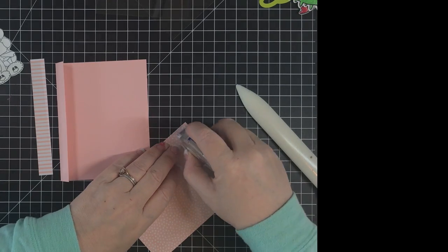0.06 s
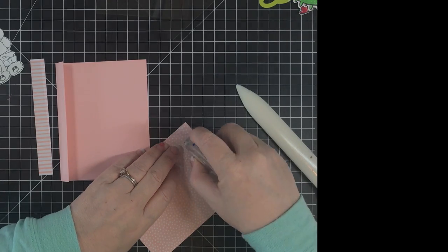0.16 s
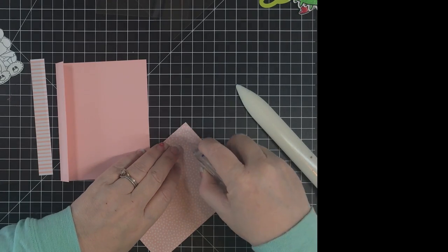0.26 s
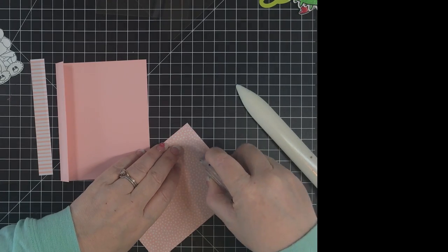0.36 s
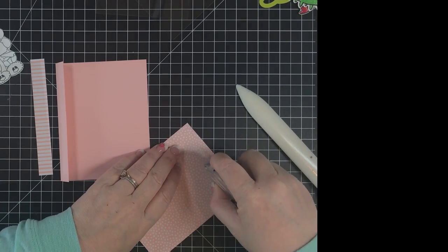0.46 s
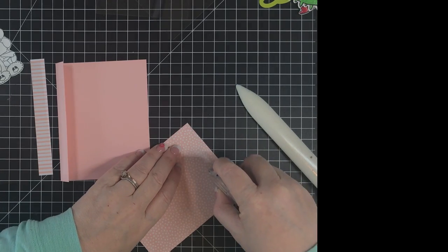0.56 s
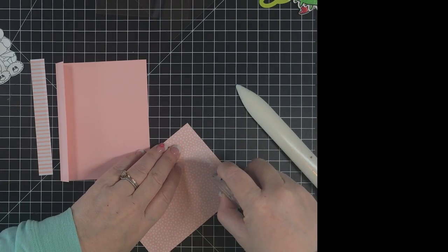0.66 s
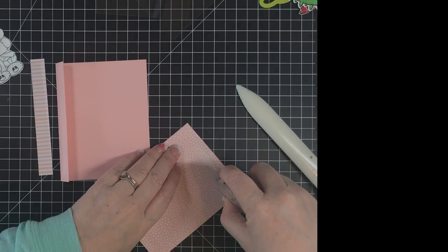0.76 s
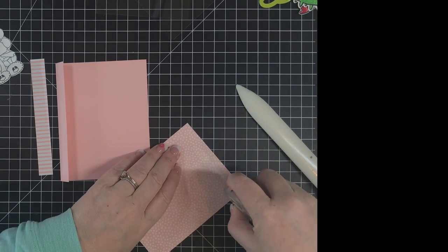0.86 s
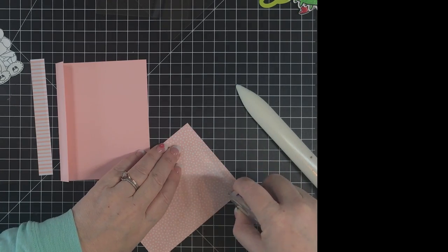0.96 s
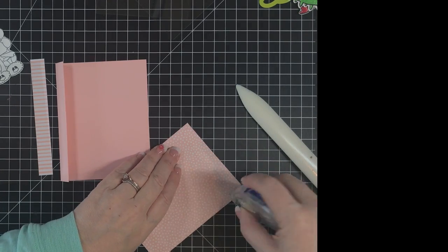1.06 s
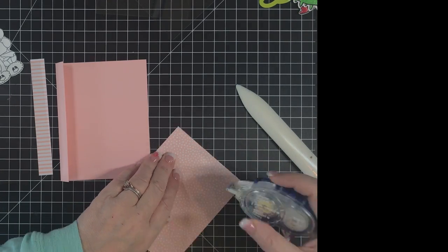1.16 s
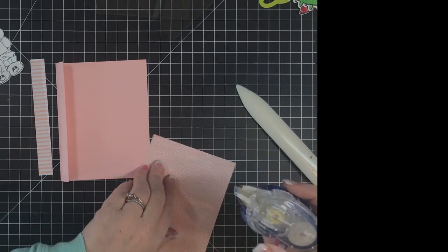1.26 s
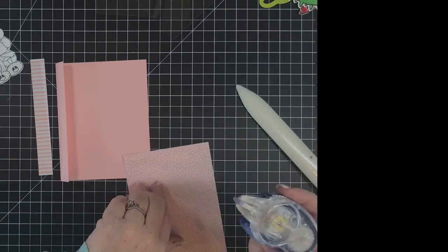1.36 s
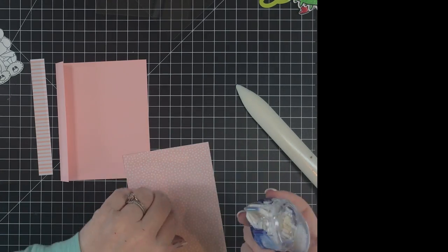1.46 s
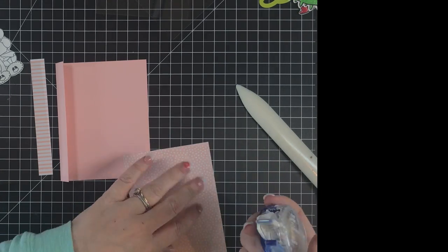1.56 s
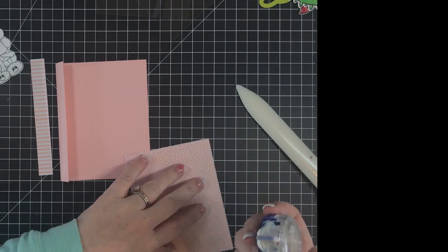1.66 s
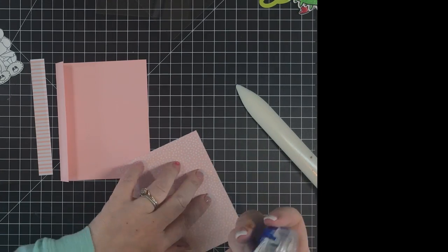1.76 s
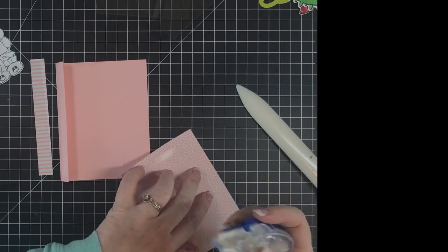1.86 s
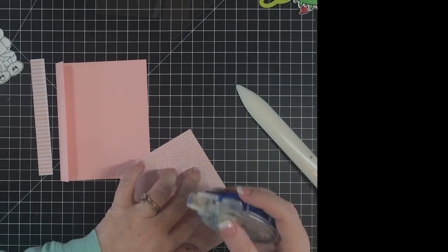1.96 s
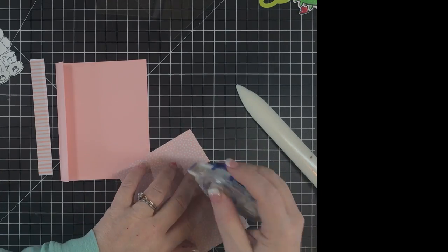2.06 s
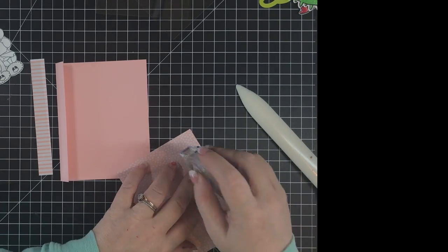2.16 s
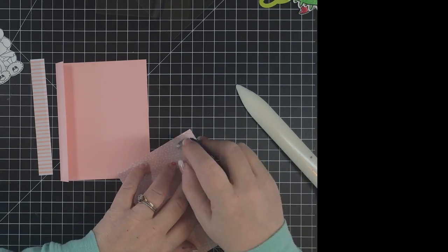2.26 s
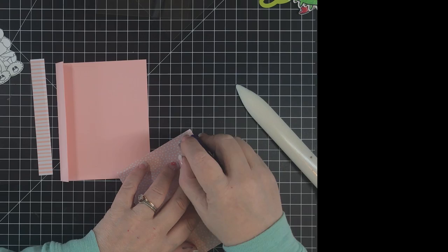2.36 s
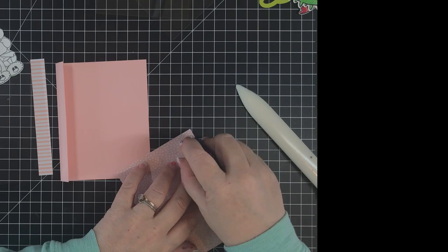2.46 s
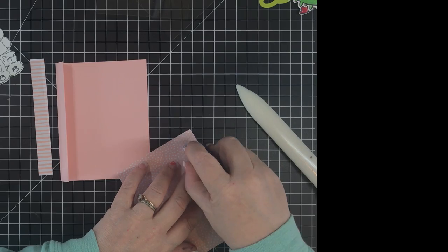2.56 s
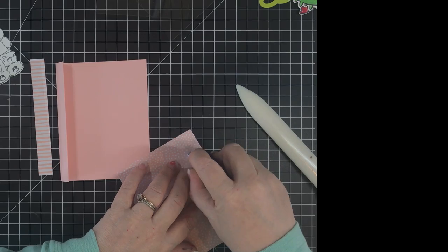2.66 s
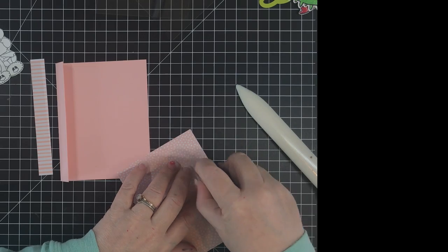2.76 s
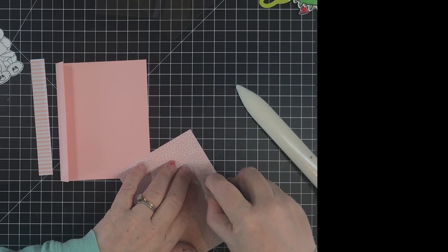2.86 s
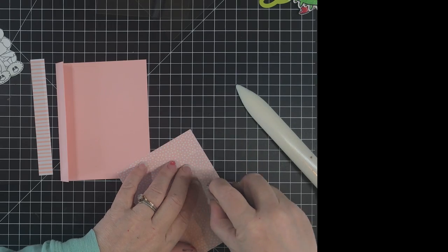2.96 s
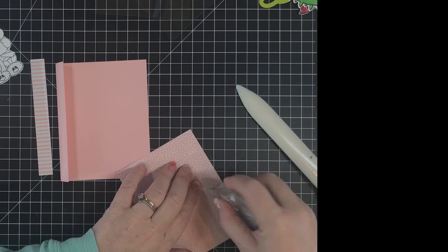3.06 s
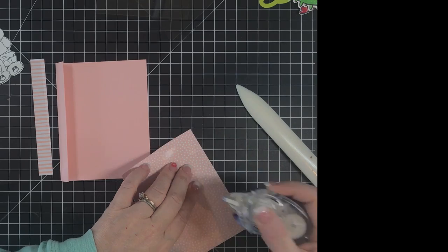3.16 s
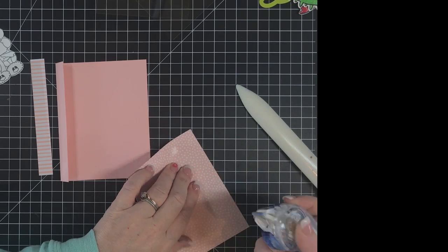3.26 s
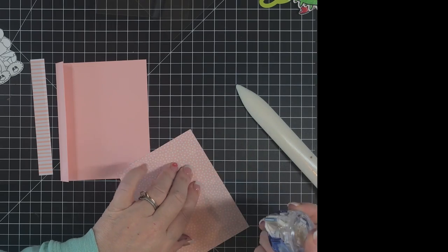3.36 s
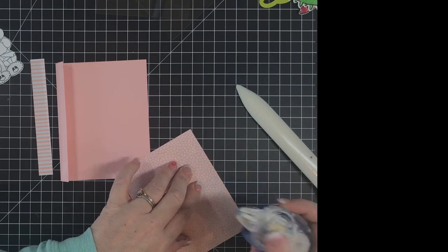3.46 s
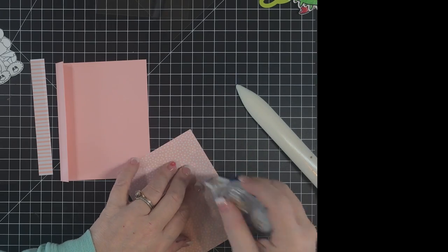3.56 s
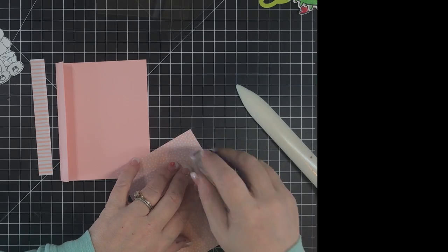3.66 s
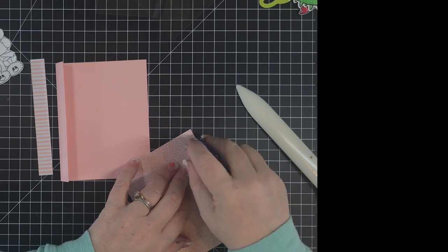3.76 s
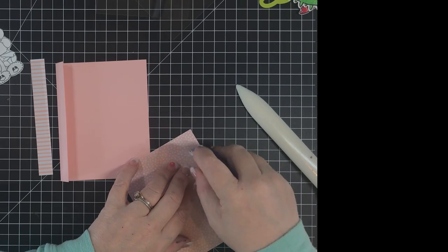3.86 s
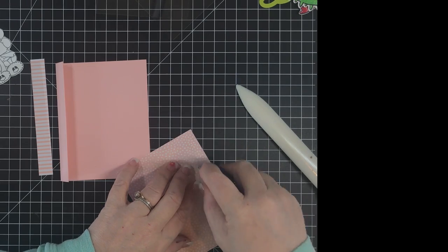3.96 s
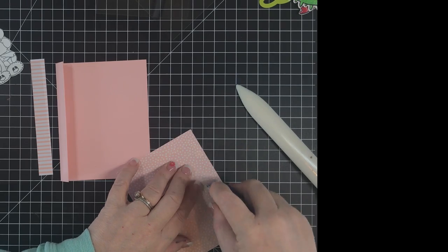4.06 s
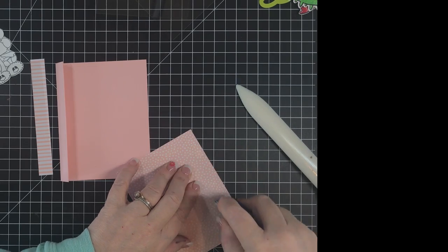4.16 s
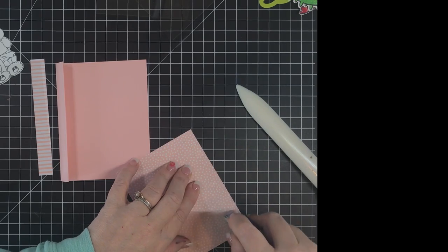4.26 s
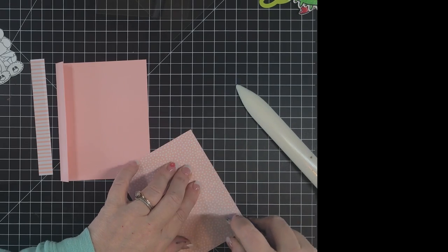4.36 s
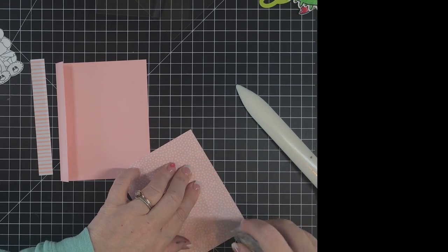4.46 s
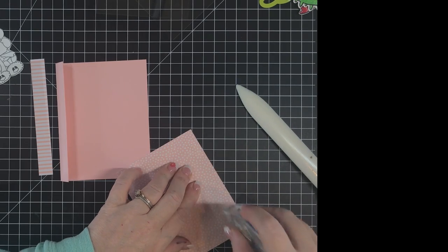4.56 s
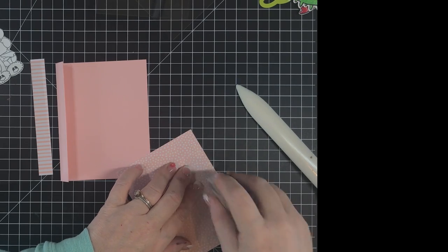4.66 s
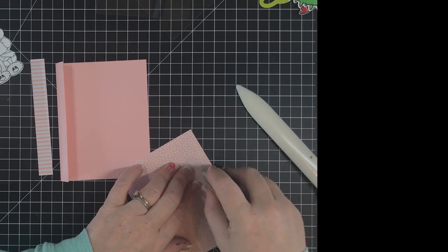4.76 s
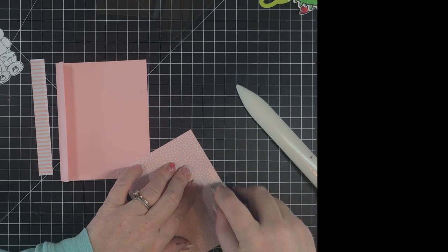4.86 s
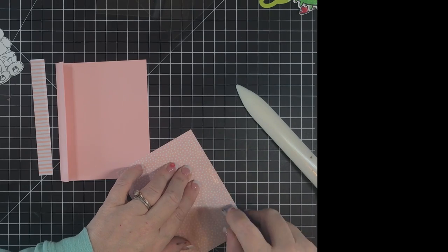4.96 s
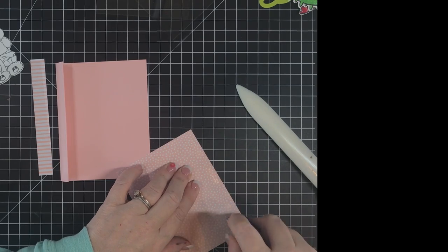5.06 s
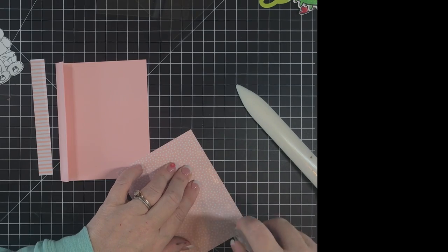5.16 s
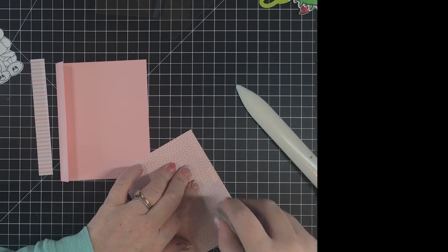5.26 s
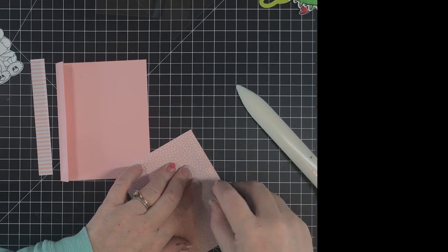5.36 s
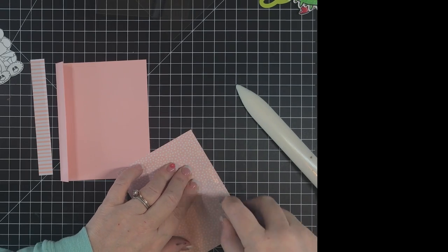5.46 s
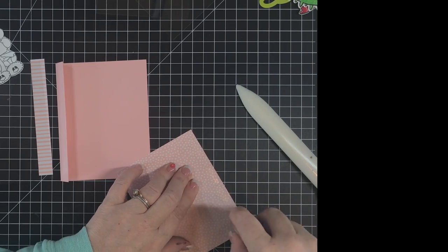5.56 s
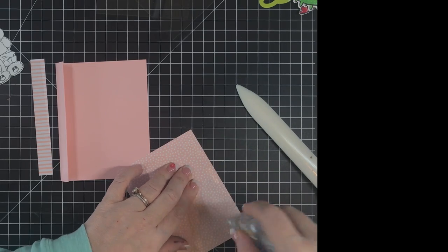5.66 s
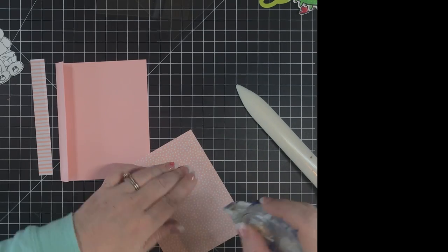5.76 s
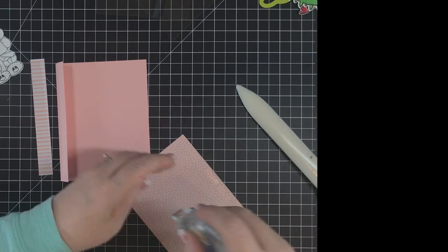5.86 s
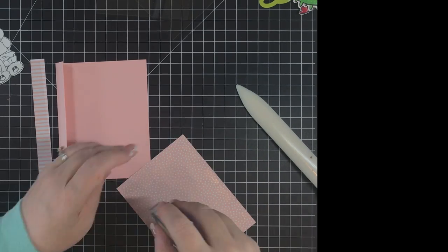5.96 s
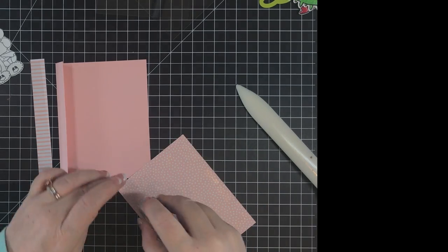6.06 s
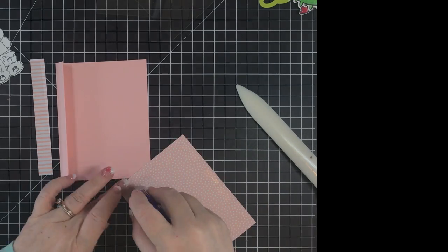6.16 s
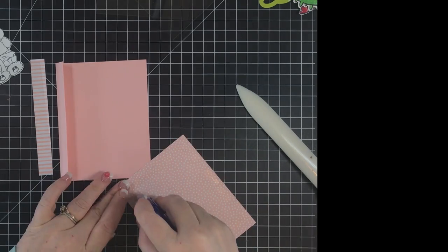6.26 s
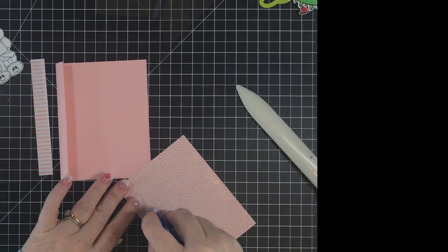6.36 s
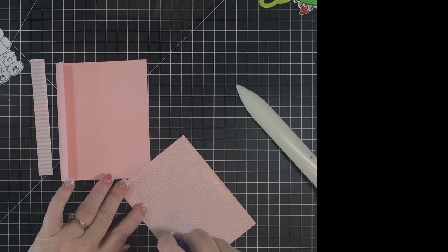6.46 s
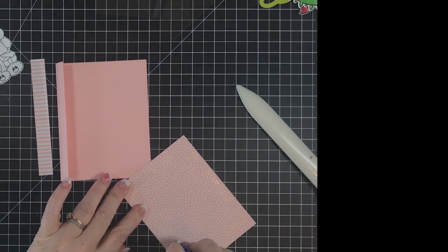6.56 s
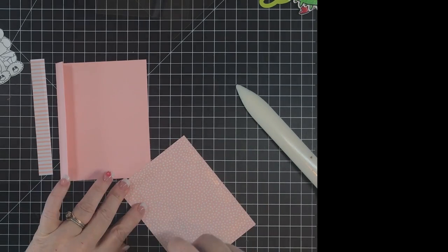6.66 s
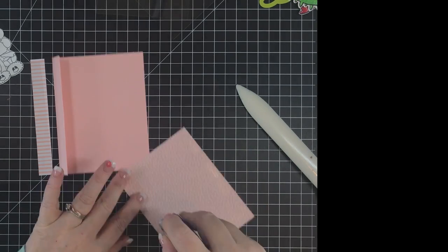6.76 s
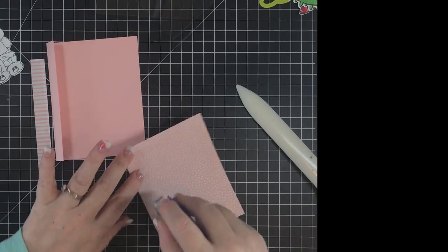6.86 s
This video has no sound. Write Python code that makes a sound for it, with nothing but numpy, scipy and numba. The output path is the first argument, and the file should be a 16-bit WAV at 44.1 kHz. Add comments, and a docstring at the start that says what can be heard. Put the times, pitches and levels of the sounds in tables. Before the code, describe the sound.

Close up in a small, faintly humming room, an adhesive tape runner makes a bright, ratcheting rasp along paper. After a pause filled with soft paper sliding and a few clicks, it goes on in short, uneven strokes. One sharp plastic snap stands out midway, and the hollow casing knocks lightly and bumps the table as it lands and lifts between strokes.

```python
"""Tape runner on paper, close up.

A hand-held tape runner is drawn along paper on a cutting mat. Its ratchet clicks tooth by tooth, blurring to a
rasp in fast strokes, and rings the hollow shell. Nose and fingers slide on the paper, touch-downs knock the
shell and thump the table, paper and plastic snap now and then; a small room hums quietly."""
import sys
import numpy as np
from scipy import signal
from scipy.fft import rfft, irfft, next_fast_len
from scipy.io import wavfile
from scipy.ndimage import uniform_filter1d
from numba import njit

SR = 44100
rng = np.random.default_rng(int(sys.argv[2]) if len(sys.argv) > 2 else 0)


def put_to_file(sound):
    """Save the sound as 16-bit audio at rate SR, in the file named by the first command-line argument."""
    columns = np.atleast_2d(sound).T  # one column per channel
    safe = np.clip(columns, -1, 1)
    whole_steps = np.round(safe * 32767)
    wavfile.write(sys.argv[1], SR, whole_steps.astype(np.int16))


N = 305172

# Runner travel, per stroke: (time [s], rolled so far [teeth])
STROKE_TRAVEL = [
    [(.1335, 0), (.1656, 2), (.3871, 15), (.4096, 16), (.4563, 19), (.528, 23), (.5618, 25), (.5705, 26),
     (.5908, 27), (.7085, 32), (.7613, 34), (.8265, 36), (.8677, 37)],
    [(2.5762, 0), (2.6099, 2), (2.6701, 7), (2.7002, 9), (2.7206, 10), (2.7432, 11), (2.7674, 12),
     (2.7929, 13)],
    [(3.8645, 0), (3.8943, 1), (3.9095, 2), (3.968, 8), (4.002, 12)],
    [(4.1334, 0), (4.1661, 2)],
    [(4.4427, 0), (4.482, 4), (4.5023, 6)],
    [(4.8324, 0), (4.842, 1), (4.861, 2), (4.916, 8), (4.936, 10)],
    [(5.0129, 0), (5.0283, 1), (5.0496, 2)],
    [(5.1539, 0), (5.205, 6), (5.2176, 7)],
    [(5.459, 0), (5.4778, 1), (5.51, 4), (5.5579, 9)],
    [(5.6306, 0), (5.646, 1), (5.6828, 5)],
    [(6.3034, 0), (6.33, 2), (6.414, 9), (6.439, 11)],
    [(6.6545, 0), (6.6728, 1), (6.7106, 4)],
]
# Tooth force, per stroke:
# (time [s], rattle [dB], fizz re rattle [dB], shell re rattle [dB], rebound re rattle [dB])
STROKE_PRESSURE = [
    [(.13, -40, -3, -3, -8), (.17, -33.5, -5, 0.5, -0.5), (.3, -34.5, -2, -2, 1),
     (.39, -31.5, -8, -6.5, -11), (.46, -29.5, -5, -5.5, -8), (.54, -40.5, 3, 1, -3.5),
     (.62, -38, 3, 1.5, -5.5), (.75, -35.5, -1, -2, -6.5), (.83, -32, -8, -6.5, -10),
     (.87, -31.5, -11, -5.5, -26)],
    [(2.58, -35, -5, -3.5, -4), (2.61, -35.5, -4, -3, -4.5), (2.67, -37, 1.5, -5, -8),
     (2.705, -34.5, -3, -3.5, -12), (2.72, -41.5, 5.5, -3.5, 6), (2.77, -42, 0, -2, 4),
     (2.79, -41, 3, -11, -20)],
    [(3.865, -32.5, -9, -3, -10), (3.895, -40, 0, -6, 1), (3.92, -36.5, -3, -1.5, 3.5),
     (3.968, -35, -2, -5, -2), (4.0, -39.5, 1, 2, -4.5)],
    [(4.13, -41.5, 2, 7.3, -8), (4.17, -37.5, -1.8, 1, -4)],
    [(4.44, -39.5, -8, -0.5, -1), (4.482, -31.5, -3, -11, -6.5), (4.5, -37.5, -6, -1, -20)],
    [(4.83, -42, -4, 0, -1), (4.86, -37.5, 2.5, -4.5, 0), (4.916, -35.5, -1, -5, 3.5),
     (4.94, -33, -6, -6, -12)],
    [(5.013, -31, -18, -6, -9), (5.03, -41, 2.5, -2.5, -3)],
    [(5.154, -35, -6, -3.3, -5), (5.2, -35.5, -2, -1.8, 2.5), (5.218, -29, -14, -1.3, -14)],
    [(5.46, -35, -5, -4, -5), (5.478, -37.5, 1, -6, 3), (5.505, -33.5, -2, -1.5, -0.5),
     (5.55, -36.5, -6, -7, -6.5)],
    [(5.63, -31, -9, -5, -10), (5.65, -35, -4, -4.5, 2), (5.68, -36.5, -7, -2.5, -19)],
    [(6.3, -39.5, 4, -5, -2), (6.33, -36, 1, -4, -2), (6.414, -34.5, -3, -8, 2.5),
     (6.44, -34, -3, -7, -6.5)],
    [(6.655, -39, 0, 0, -4), (6.673, -29.5, 0, -2.5, -4.5), (6.69, -38, 3, -7, 0),
     (6.71, -33, -13, -0.5, -20)],
]


def stroke_teeth(travel, pressure):
    """Each tooth clicks once; the pawl rebounds with a second, usually weaker and fizzier click."""
    s, rolled = np.transpose(travel)
    tooth_s = np.interp(np.arange(rolled[-1] + 1), rolled, s)
    pressure_s, *columns = np.transpose(pressure)
    db, fizz_db, shell_db, rebound_db = (np.interp(tooth_s, pressure_s, c) for c in columns)
    wait_s = np.minimum(.46 * np.diff(tooth_s, append=np.inf), .0115)
    click = np.transpose([tooth_s, db, db + fizz_db, db + shell_db])
    rebound = click + np.transpose([wait_s, rebound_db, .27 * rebound_db, .81 * rebound_db])
    clicks = np.concatenate([click, rebound])  # (time [s], rattle [dB], fizz [dB], shell [dB])
    return list(clicks + rng.standard_normal(clicks.shape) * [.0005, 1.2, 1.8, 1.5])


# Lone teeth and small ticks: (time [s], rattle [dB], fizz re rattle [dB])
LONE_TICKS = [(0.0334, -55, -9), (.059, -37.5, -6), (0.0815, -39, -6), (.1155, -38.5, -2),
              (0.8873, -42.5, 6), (0.984, -53, -5), (1.1118, -47, 9), (1.152, -47, -4), (1.174, -48, -6),
              (1.475, -55, 8), (1.4856, -70, 8), (1.6946, -56, 2), (1.7097, -50, -2), (1.724, -53, -5),
              (1.7352, -69, 5), (1.9647, -52, -10), (2.0226, -69, 3), (2.1134, -57, -4), (2.1213, -59, -10),
              (2.1363, -62, -1), (2.4137, -31, -45), (2.479, -35.5, -4), (2.506, -36.5, -4),
              (2.5269, -42, 1), (2.9415, -41, -2), (2.9617, -34.5, -5), (2.9835, -49, 7), (2.998, -36, 2),
              (3.026, -40.5, 7), (3.0785, -47.5, -9), (3.1141, -39, 7), (3.1267, -39, -7),
              (3.1677, -47.5, 8), (3.346, -49, -4), (3.7713, -54, -3), (3.823, -35.5, -9),
              (3.8495, -46, -12), (3.858, -44, -2), (4.0894, -41.5, -1), (4.102, -37.5, 2),
              (4.3242, -38, -1), (4.3544, -46, 7), (4.426, -47.5, 9.5), (4.7852, -38, -8),
              (4.8255, -47, -9), (5.076, -45, -9), (5.429, -36.5, -2), (5.5794, -44, 5),
              (6.2331, -33.5, -16), (6.2562, -54, -7), (6.27, -42, -12), (6.2809, -35.5, -2),
              (6.589, -40.5, 0), (6.6062, -44, 7), (6.6132, -33.5, -23), (6.632, -39.5, 2)]
# Pawl rattle spectrum: (frequency [Hz], density [dB])
RATTLE_SPECTRUM = [(3000, -17.5), (4700, -4), (5500, 2), (7000, -0.5), (7600, -3), (8500, 0.5), (9800, -1),
                   (10600, -8), (12000, -7)]


def ratchet():
    """The pawl drops off each tooth: a short rattle, a fizz of adhesive letting go, a ring of the shell."""
    clicks = [(s, db, db + fizz_db, db - 2.5 + .15 * fizz_db) for s, db, fizz_db in LONE_TICKS]
    for travel, pressure in zip(STROKE_TRAVEL, STROKE_PRESSURE):
        clicks += stroke_teeth(travel, pressure)
    s, rattle_db, fizz_db, shell_db = np.transpose(clicks)
    shape = dict(spike_s=.0008, tail_s=.0017, tail_db=-4)
    rattle = colour(burst(impulses(s, rattle_db - 2), **shape), RATTLE_SPECTRUM)
    peel = burst(impulses(s, fizz_db + 1.5), **shape)
    fizz_hz = curves(GRIP)[-1]
    fizz = mode(peel, fizz_hz, width_hz=8500)
    fizz_edge = undb(-10.5) * mode(peel, fizz_hz + 860, width_hz=910)
    ring = shell(burst(impulses(s, shell_db - 5.5), **shape))
    return rattle + fizz + fizz_edge + ring


# Loading of the runner by hand and paper:
# (time [s], hollow mode [Hz], hollow mode [dB], middle mode [dB], upper mode [Hz], fizz centre [Hz])
GRIP = [(0, 1620, 0, -4.5, 3870, 14800), (.2, 1650, -10.5, -6, 4350, 13400),
        (.35, 1690, -2, -9, 4250, 13500), (.6, 1730, -9.5, -9.5, 4070, 14400),
        (.9, 1720, -5, -5.5, 4040, 15600), (2.65, 1640, -6, -3.5, 4250, 13600),
        (3, 1570, -11, 2, 4500, 14000), (3.95, 1630, -9, -3, 4300, 13700),
        (4.2, 1600, -18, -11, 4340, 14600), (4.5, 1530, -7.5, -0.5, 3960, 13200),
        (4.9, 1680, -5, -1, 4420, 13400), (5.2, 1380, -12.5, -2.5, 4210, 14300),
        (5.5, 1480, -7, -0.5, 4310, 13700), (6.35, 1510, -6.5, -1, 4270, 13450),
        (6.7, 1434, -6, -3, 4090, 13800)]


def shell(x):
    """The hollow plastic shell rings in three modes; their mix and tuning shift with the grip."""
    hollow_hz, hollow_db, middle_db, upper_hz, _ = curves(GRIP)
    hollow = undb(hollow_db) * mode(x, hollow_hz, width_hz=550)
    middle = undb(middle_db) * mode(x, 2850, width_hz=1200)
    upper = mode(x, upper_hz, width_hz=950)
    return hollow - middle + upper


# Hollow knocks: (time [s], level [dB], pitch [Hz])
SHELL_KNOCKS = [(0.032, -39, 1550), (1.709, -39, 1430), (2.417, -50, 1070), (2.483, -35.5, 1660),
                (3.427, -22.5, 1560), (3.775, -48, 1670), (3.825, -27.5, 1450), (4.783, -32, 980),
                (5.075, -43, 1640), (5.219, -25, 1380), (5.429, -28.5, 1600), (5.684, -29, 1370),
                (5.847, -41, 1210), (6.236, -28, 1260), (6.271, -43, 1300), (6.708, -31, 1460)]


def knocks():
    """The shell's air space rings for a few cycles as the runner lands or lifts."""
    t, out = np.arange(int(.03 * SR)) / SR, np.zeros(N + SR)
    for s, db, hz in SHELL_KNOCKS:
        push = rng.standard_normal(len(t)) * np.exp(-t / .003)
        start = int(s * SR)
        out[start:start + len(t)] += undb(db - 3) * mode(push, hz, width_hz=1200)
    return out[:N]


# Snaps, the first of paper, the others of plastic: (time [s], level [dB], body re level [dB])
SNAPS = [(1.0705, -28.5, -33), (1.1238, -22, -23.5), (1.953, -25, -6), (3.0874, -23.5, -42),
         (3.1068, -15.5, -43), (3.4241, -6.5, -12), (4.6804, -50, -21), (4.996, -18, -21),
         (5.4899, -22, -14), (5.8067, -27, -30), (6.3124, -19.5, -34)]
# Snap body spectrum: (frequency [Hz], density [dB])
SNAP_BODY_SPECTRUM = [(500, 4), (1200, -2), (3500, 27.5), (6000, 8), (13000, -79), (16000, -63)]
# Treble spectrum of snap edges and paper friction: (frequency [Hz], density [dB])
CRISP_SPECTRUM = [(3000, -4), (4500, 2), (6600, 8), (7700, 3.5), (8700, 7.5), (10600, 3), (13000, 7),
                  (16000, 1.5)]


def snaps():
    """Very short cracks of paper or plastic, a bright edge on a duller body."""
    snap_s, db, body_db = np.transpose(np.add(SNAPS, [.0012, 0, 0]))
    shape = dict(spike_s=.00015, tail_s=.0018, tail_db=-13)
    edge = burst(impulses(snap_s, db - 21), **shape) + impulses(snap_s, db + 2)
    body = burst(impulses(snap_s, db + body_db - 5.5), **shape)
    return colour(edge, CRISP_SPECTRUM) + colour(body, SNAP_BODY_SPECTRUM)


# Nose on paper: (peak time [s], rise [s], fall [s], treble [dB], drop at ends [dB], shell send [dB])
NOSE_GLIDES = [(.94, 0.042, 0.038, -53.5, 3, 8.5), (2.86, .055, .075, -51.5, 2, 4.5),
               (3.0, .05, 0.15, -62, 5, -1), (4.05, 0.03, 0.037, -50, 3, 10),
               (4.29, 0.095, 0.029, -50.5, -1, 10.5), (4.98, .025, .01, -48.5, -2, 4),
               (5.135, .05, 0.011, -57.5, 0.5, 16.5), (5.605, 0.016, .017, -47.5, 6, 5),
               (6.55, 0.094, 0.039, -48.5, 2, 5.5)]
# Paper and fingers on the mat:
# (peak time [s], rise [s], fall [s], treble [dB], drop at ends [dB], scrape re treble [dB])
PAPER_SLIDES = [(1.19, 0.087, 0.063, -54.5, 8.5, -6.5), (1.3, 0.045, 0.054, -49.5, 5.5, -21),
                (1.41, 0.066, 0.046, -44.5, 11, -13), (1.635, .025, .03, -71, 4, 2),
                (1.74, 0.03, 0.024, -56.5, 6, -18), (1.78, 0.018, 0.053, -48, 11.5, -1),
                (1.9, .07, .06, -58, 3, -2), (2.115, 0.022, 0.032, -64, 25, 7.5),
                (4.7, 0.16, 0.082, -64.5, 2, 0), (5.84, .12, 0.024, -60, 5.5, 1),
                (5.88, 0.019, 0.026, -46, 17, -11.5), (6.1, 0.14, 0.11, -71.5, 4, 1),
                (6.77, .04, .03, -62.5, 7, -1), (6.85, 0.047, 0.061, -47.5, 6.5, -12)]
# Scrape spectrum: (frequency [Hz], density [dB])
SCRAPE_SPECTRUM = [(350, -10), (700, -1), (1200, 3.5), (2000, -1), (4400, -1), (6000, -47)]


def slides():
    """Paper fibres hiss: under the nose they ring the shell, under paper and fingers they scrape lower."""
    grain = undb(1.2 * walk(rate_hz=150) + .8 * walk(rate_hz=30))
    fibres = grain * rng.standard_normal((3, N))
    nose_gain, shell_gain = slide_gains(NOSE_GLIDES)
    paper_gain, scrape_gain = slide_gains(PAPER_SLIDES)
    hiss = (nose_gain + paper_gain) * colour(fibres[0], CRISP_SPECTRUM)
    ring = undb(-16.5) * shell(shell_gain * fibres[1])
    scrape = scrape_gain * colour(fibres[2], SCRAPE_SPECTRUM)
    return hiss + ring + scrape


def slide_gains(rows, fade_s=.0088):
    """Treble and lower-band gains: each slide fades in, swells to its peak, sinks and fades out."""
    t, treble, lower = np.arange(N) / SR, np.zeros(N), np.zeros(N)
    for peak_s, rise_s, fall_s, db, drop_db, lower_db in rows:
        start_s, end_s = peak_s - rise_s, peak_s + fall_s
        touch = np.clip(np.minimum(t - start_s, end_s - t) / fade_s + 1, 0, 1)
        gain = touch * undb(db - abs(drop_db) * np.interp(t, [start_s, peak_s, end_s], [1, 0, 1]))
        treble += gain
        lower += gain * undb(lower_db)
    return treble, lower


# Touch-downs on the table: (time [s], level [dB])
TABLE_THUMPS = [(0.056, -42.5), (1.174, -47.5), (1.71, -49), (1.968, -42.5), (2.412, -39.5), (3.422, -43),
                (3.823, -29), (4.116, -43.5), (4.456, -41.5), (4.783, -30.5), (4.832, -34.5), (4.945, -42),
                (5.216, -45.5), (5.428, -29), (5.563, -37.5), (5.595, -44), (5.649, -38), (6.234, -32.5),
                (6.268, -34.5), (6.446, -37.5), (6.67, -43), (6.712, -41), (6.801, -39)]
# Table-top modes: (frequency [Hz], level [dB], T60 [s])
TABLE_MODES = [(56, -14, .16), (88, -13, .13), (135, 0, .11), (165, -12, .1), (220, -4, .08),
               (295, -5, .09), (385, -13, .06)]


def thumps(attack_s=.0023, shudder_t60_s=.4):
    """A soft push rings the table top, differently at each spot; table and frame shudder loosely."""
    t, out = np.arange(int(.3 * SR)) / SR, np.zeros(N + SR)
    attack = 1 - np.exp(-t / attack_s)
    spots_db = 2 * rng.standard_normal((len(TABLE_THUMPS), len(TABLE_MODES)))
    for (s, db), spot_db in zip(TABLE_THUMPS, spots_db):
        modes = sum(undb(mode_db + offset_db) * np.sin(2 * np.pi * hz * t) * decay(t, t60_s)
                    for (hz, mode_db, t60_s), offset_db in zip(TABLE_MODES, spot_db))
        rumble = mode(rng.standard_normal(len(t)), 107, width_hz=246)
        shudder = level(rumble, -13.5) * decay(t, shudder_t60_s)
        start = int(s * SR)
        out[start:start + len(t)] += undb(db + 2) * (modes + shudder) * attack
    return out[:N]


# Early echoes: (delay [s], level [dB])
EARLY_ECHOES = [(.0035, -7), (.0115, -20)]
# Diffuse tail bands: (centre [Hz], T60 [s], relative level [dB])
TAIL_BANDS = [(1290, 0.42, -13.5), (9300, 0.21, -16.5)]


def room(x, build_s=.016):
    """Two early echoes from near surfaces, then a diffuse tail that loses its treble first."""
    t = np.arange(int(.4 * SR)) / SR
    tail = np.zeros(len(t))
    for hz, t60_s, db in TAIL_BANDS:
        band = bandpass(rng.standard_normal(len(t)), np.full(len(t), float(hz)), 1.56 * hz)
        tail += undb(db) * band * decay(t, t60_s)
    response = tail * np.clip(t / build_s, 0, 1) / np.sqrt(.0081 * SR)
    response[0] = 1  # direct sound
    for delay_s, db in EARLY_ECHOES:
        response[int(delay_s * SR)] += undb(db)
    return signal.fftconvolve(x, response)[:N]


# Air noise spectrum: (frequency [Hz], density [dB])
AIR_SPECTRUM = [(20, -46), (35, -10), (55, 8), (80, -0.5), (160, -6), (290, -4.5), (450, -11.5),
                (1100, -12.5), (2050, -21), (5000, -28.5), (16000, -35.5)]
# Mains hum partials: (frequency [Hz], RMS level [dB])
MAINS_HUM = [(59.5, -65.5), (119.8, -54)]


def room_tone():
    """Soft air noise and a slightly wavering mains hum."""
    t, hum = np.arange(N) / SR, np.zeros(N)
    for hz, db in MAINS_HUM:
        amplitude = np.sqrt(2) * undb(db + 1.1 * walk(rate_hz=13))
        hum += amplitude * np.sin(2 * np.pi * (hz * t + .022 * walk(rate_hz=3.6)))
    air = colour(rng.standard_normal(N), AIR_SPECTRUM)
    return level(air, -57) + hum


def undb(db):
    return 10 ** (np.asarray(db) / 20)


def level(x, rms_db):
    return x * undb(rms_db) / np.sqrt(np.mean(x ** 2))


def decay(t, t60_s):
    return 1000. ** (-t / t60_s)


def curves(table):
    """Columns after time, interpolated per sample."""
    s, *columns = np.transpose(table)
    return [np.interp(np.arange(N) / SR, s, c) for c in columns]


def walk(rate_hz):
    """Random steps, smoothed twice; spread near 1."""
    hold = int(SR / rate_hz)
    steps = np.repeat(rng.standard_normal(N // hold + 1), hold)
    return np.sqrt(2) * uniform_filter1d(uniform_filter1d(steps, hold), hold)[:N]


def impulses(s, db):
    """Train of single-sample kicks."""
    out = np.zeros(N)
    np.add.at(out, (np.asarray(s) * SR).astype(int), undb(db))
    return out


def burst(kicks, spike_s, tail_s, tail_db):
    """Each kick gates noise, a spike on a weaker tail, with the energy of 5 ms at the kick's level."""
    t = np.arange(int(.03 * SR)) / SR
    attack = 1 - np.exp(-3 * t / spike_s)
    power = attack * (np.exp(-t / spike_s) + undb(2 * tail_db) * np.exp(-t / tail_s))
    power *= .005 * SR / np.sum(power)
    envelope = np.sqrt(np.maximum(signal.fftconvolve(kicks ** 2, power)[:N], 0))
    return envelope * rng.standard_normal(N)


def colour(x, spectrum):
    """Spectral shaping, unit power gain for white noise."""
    hz, db = np.transpose(spectrum)
    size = next_fast_len(len(x))
    bin_hz = np.arange(size // 2 + 1) * SR / size
    gain = undb(np.interp(np.log(bin_hz + 1), np.log(hz), db))
    return irfft(rfft(x, size) * level(gain, 0), size)[:len(x)]


@njit
def bandpass(x, hz, width_hz):
    """State-variable band-pass, movable centre, unit gain at the centre."""
    y, band_state, low_state = np.empty(len(x)), 0., 0.
    for i in range(len(x)):
        g, damping = np.tan(np.pi * hz[i] / SR), width_hz / hz[i]
        band = (band_state + g * (x[i] + 1e-18 - low_state)) / (1 + g * (g + damping))
        band_state = 2 * band - band_state
        low_state += 2 * g * band
        y[i] = damping * band
    return y


def mode(x, hz, width_hz):
    """Steep resonance: two band-passes in series, scaled for bandwidth."""
    hz, width_hz = np.zeros(len(x)) + hz, float(width_hz)
    return bandpass(bandpass(x, hz, width_hz), hz, width_hz) / np.sqrt(np.pi * width_hz / 2 / SR)


def scene():
    """Runner and paper through the room, plus table thumps and room tone; mono."""
    runner = ratchet() + snaps() + knocks() + slides()
    return (room(runner) + thumps() + room_tone())[None]


def record(dry, bass_cut_hz=25, top_hz=15900):
    """The microphone drops the deepest bass and the recorder cuts the top."""
    thinned = signal.sosfilt(signal.butter(2, bass_cut_hz, "high", fs=SR, output="sos"), dry)
    return signal.sosfilt(signal.ellip(8, .2, 70, top_hz, fs=SR, output="sos"), thinned)


dry = scene()
out = record(dry)
put_to_file(out)
```